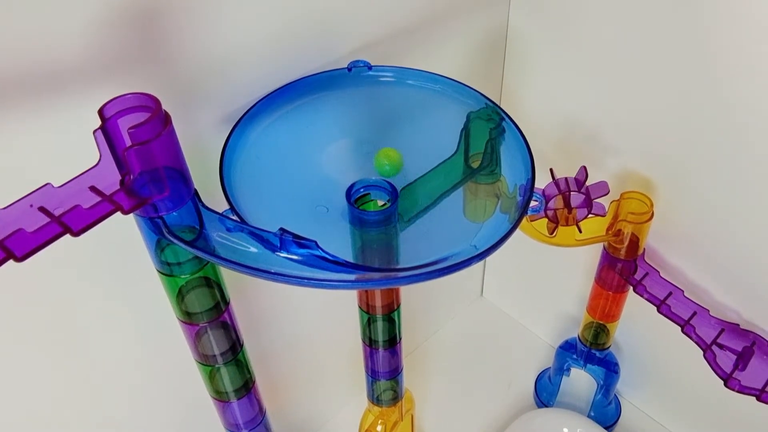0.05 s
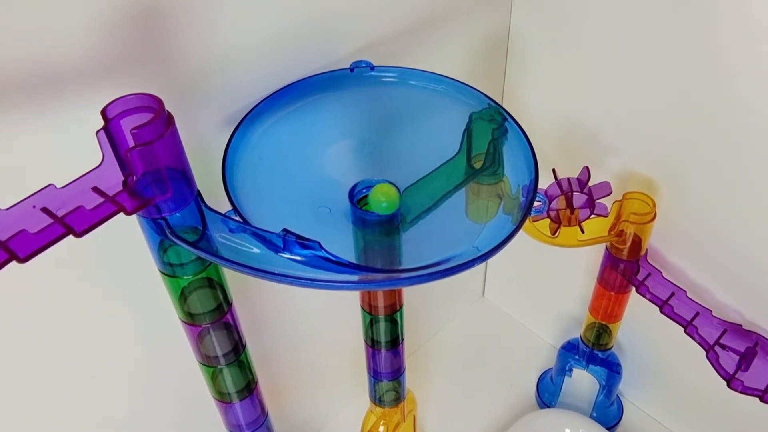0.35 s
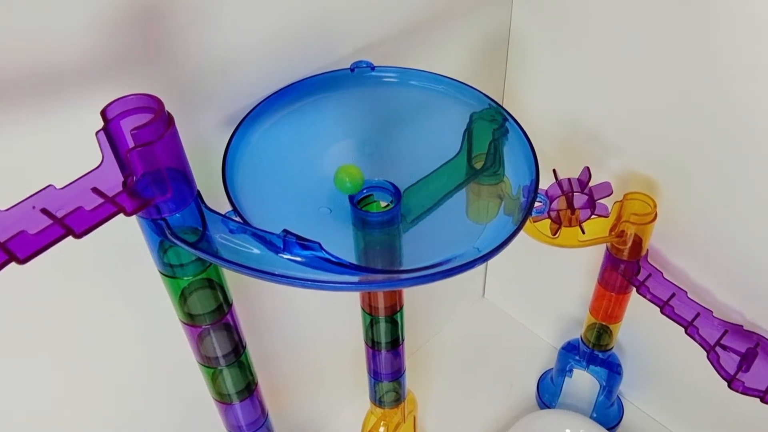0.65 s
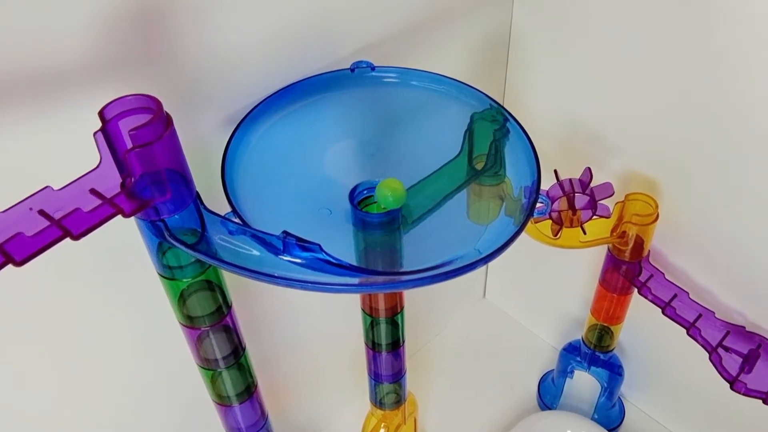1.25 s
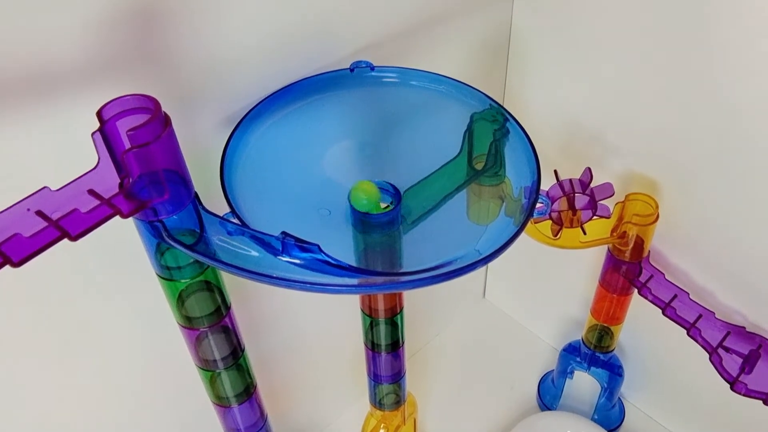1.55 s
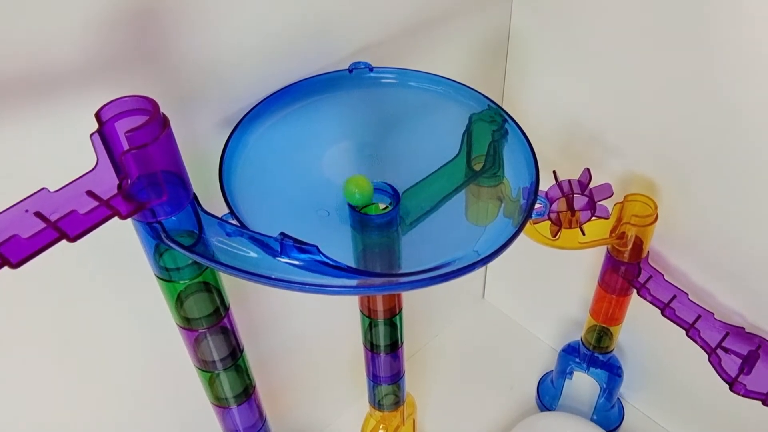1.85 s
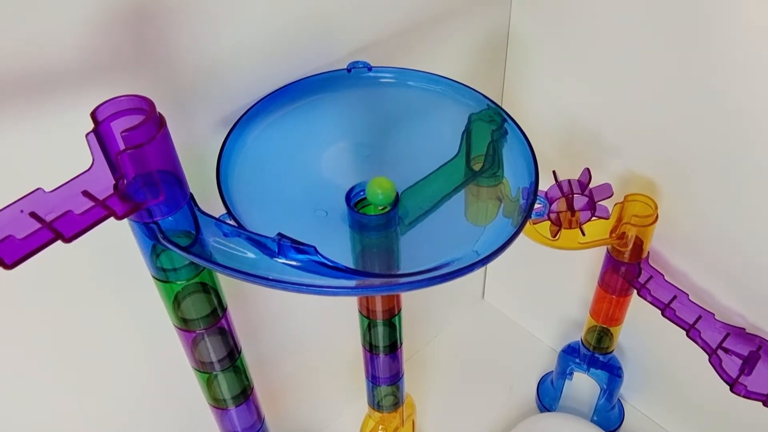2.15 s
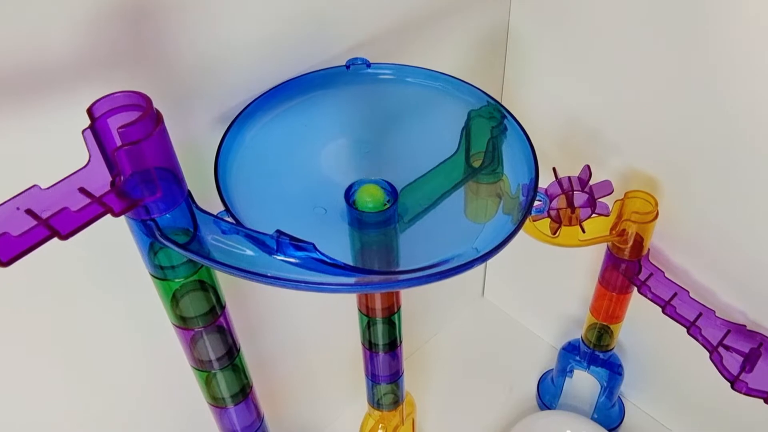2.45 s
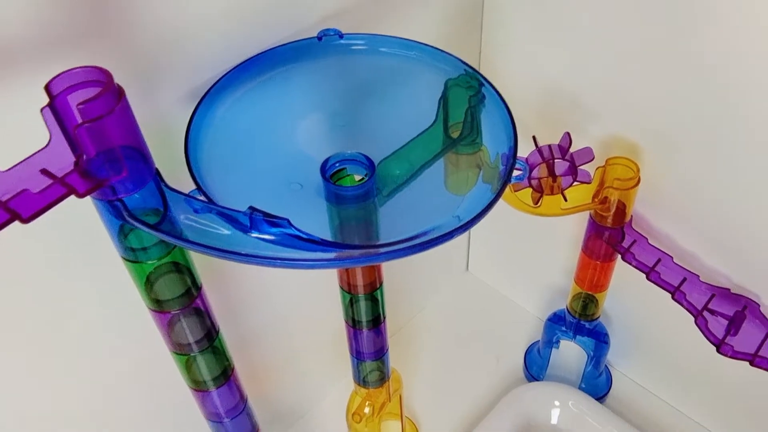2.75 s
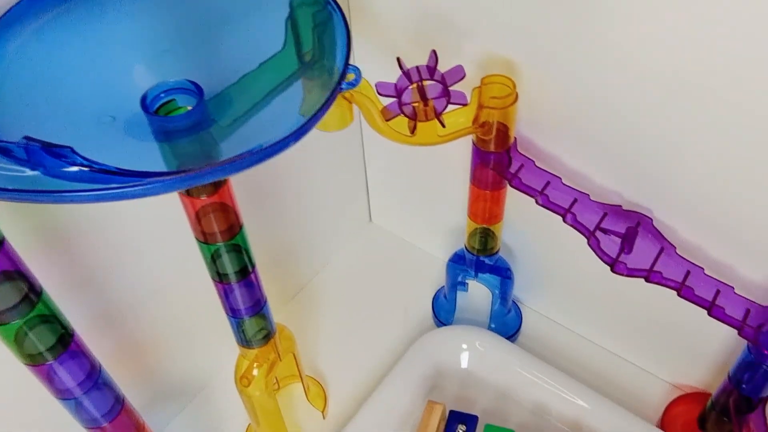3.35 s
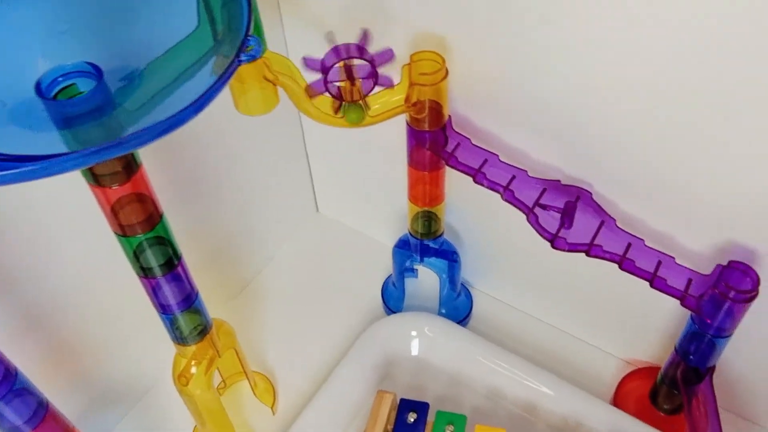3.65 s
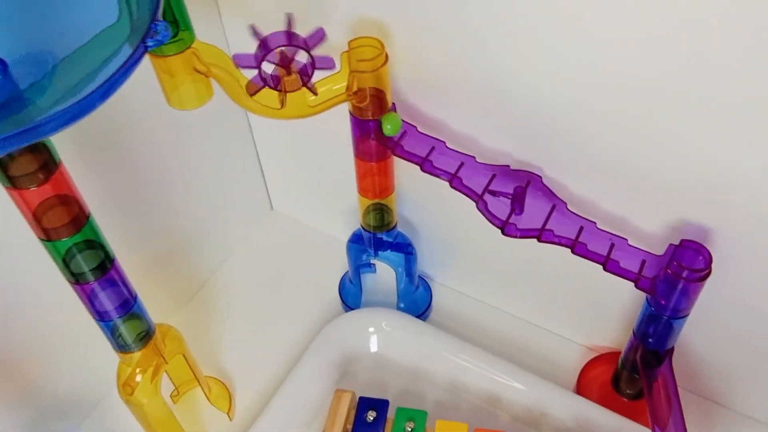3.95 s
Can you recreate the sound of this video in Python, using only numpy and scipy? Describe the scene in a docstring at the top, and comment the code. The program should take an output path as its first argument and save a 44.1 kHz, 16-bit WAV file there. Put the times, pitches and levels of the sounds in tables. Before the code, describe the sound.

A marble circles a plastic funnel, rattles through and clatters along a toy track.

```python
"""Over the low rumble of a small, quiet room, a glass marble circles a plastic funnel, ringing the
bowl as it rolls over tiny flaws. It spirals faster and, near 2.5 s, rattles through the neck.
It runs down a chute and, from 3.1 s, bounces in a hollow tower, trips a paddle wheel and drops
onto the next track. The room answers each knock with a short tail."""
import sys
import numpy as np
from scipy import signal
from scipy.fft import rfft, irfft
from scipy.io import wavfile

SR = 44100
rng = np.random.default_rng(int(sys.argv[2]) if len(sys.argv) > 2 else 0)


def unload_audio(sound):
    """Save the sound as a 16-bit wav file, at the path given as the first command line argument."""
    columns = np.transpose(np.atleast_2d(sound))
    # keep every value between -1 and 1, then stretch to whole-number steps
    steps = np.round(np.clip(columns, -1, 1) * 32767)
    wavfile.write(sys.argv[1], SR, steps.astype(np.int16))


N = 176400

# tone of the room's rumble (frequency [Hz], level [dB])
RUMBLE_COLOUR = [(25, -6.5), (72, 4), (100, -6.5), (300, -23.5), (700, -19.5), (3000, -28), (6000, -65),
                 (16500, -47)]
# rolling in the bowl, swelling on each orbit (time [s], level [dB])
BOWL_ROLL = [(0, -54.5), (.06, -63.5), (.11, -73.5), (.15, -57.5), (.34, -63.5), (.38, -70.5), (.46, -63.5),
             (.52, -57), (.63, -60.5), (.7, -80), (.78, -55), (.86, -67.5), (1.05, -59.5), (1.16, -53),
             (1.22, -79.5), (1.4, -63), (1.46, -72.5), (1.6, -71.5), (1.68, -55.5), (1.745, -48.5),
             (1.78, -102), (1.96, -61.5), (2.02, -50.5), (2.08, -64.5), (2.17, -54), (2.22, -56),
             (2.33, -41.5), (2.37, -67), (2.47, -42), (2.66, -45)]
# bumps over flaws in the bowl (time [s], body [dB], treble [dB])
BOWL_BUMPS = [(0.015, -47.5, -65), (0.129, -50, -65), (0.162, -46.5, -64), (0.208, -43.5, -63),
              (0.468, -57, -69.5), (0.589, -43.5, -56), (0.648, -50.5, -78), (0.962, -71, -88),
              (1.035, -51.5, -60), (1.737, -55, -56.5), (1.886, -50.5, -58.5), (1.998, -45.5, -50.5),
              (2.191, -40, -47), (2.211, -40, -44), (2.318, -34, -36)]
# the tightening spiral (time [s], orbit period [s])
ORBIT_PERIODS = [(1.3, .44), (2.199, .16), (2.602, .04)]
# crowded, short resonances of the bowl (frequency [Hz], level [dB])
BOWL_COLOUR = [(100, -34), (280, -12), (520, -1.5), (820, -24.5), (1080, -26), (1300, 4), (2200, 10),
               (3200, -7), (4300, -14), (7400, -32), (9500, -63), (15000, -55)]
# clear ring of the bowl and of its hollow rim (frequency [Hz], level [dB], t60 [s])
BOWL_RING = [(710, -13, 0.095), (1260, 1, 0.12), (1465, -2, 0.079), (1592, -4.5, 0.083), (1753, -0.5, 0.12),
             (1910, -2, 0.094), (2140, 1, 0.076), (2845, -10, 0.04), (3434, -13.5, 0.074)]
RIM_RING = [(754, -1.5, .12), (842, 0, 0.11), (970, 2, 0.13)]
# marble spinning in the neck (time [s], level [dB])
NECK_SPIN = [(2.42, -59), (2.58, -46.5), (2.71, -32), (2.84, -48)]
# rattles against the neck (time [s], body [dB], treble [dB])
NECK_RATTLES = [(2.456, -38, -51.5), (2.514, -49, -43.5), (2.554, -50, -49), (2.594, -36.5, -37),
                (2.624, -32, -37.5), (2.66, -28.5, -30), (2.674, -25.5, -27), (2.68, -32, -26.5),
                (2.685, -21.5, -19.5), (2.699, -15, -30), (2.733, -30, -41), (2.777, -33, -40.5)]
# crowded resonances of the neck (frequency [Hz], level [dB])
NECK_COLOUR = [(100, -17), (480, -21), (720, -9.5), (980, -37.5), (1400, 1.5), (3300, 0), (5000, -6),
               (9800, -19), (14000, -15.5), (16000, -23.5)]
# clear ring of the neck (frequency [Hz], level [dB], t60 [s])
NECK_RING = [(704.6, -7, 0.099), (1236, -3.5, 0.17), (1434, 4.5, 0.054), (1766, -10, 0.14),
             (2120, 3.5, 0.093), (3230, -6.5, 0.056), (3985, 0.5, 0.048), (5010, 1, 0.048)]
# marble running along the chutes (time [s], level [dB])
CHUTE_ROLL = [(2.7, -49), (2.8, -48), (2.85, -53.5), (2.97, -50.5), (3.08, -53.5), (3.2, -56.5),
              (3.33, -45), (3.43, -115), (3.56, -46.5), (3.66, -41.5), (3.81, -44), (3.9, -58), (4.0, -36)]
# crowded resonances of chute and track (frequency [Hz], level [dB])
TRACK_COLOUR = [(40, -55), (90, -4), (200, -8), (490, -15.5), (900, -2), (2600, 3.5), (4400, 6.5),
                (5600, -4), (7500, -12), (10000, -25.5), (11500, -18), (13000, -22), (15300, -6),
                (16200, -25)]
# ring of the chute under the marble (frequency [Hz], level [dB], t60 [s])
CHUTE_RING = [(1043.5, 0, 0.091), (1486, 0, 0.05), (2100, 0, 0.11)]
# hits on tower, wheel and track (time [s], thud [dB], body [dB], treble [dB], tick [dB])
KNOCK_HITS = [(3.091, -45.5, -19, -17, -25), (3.138, -41, -33.5, -23.5, -42),
              (3.156, -30.5, -24, -18, -19.5), (3.183, -40.5, -23, -53, -29),
              (3.211, -34.5, -29, -18, -25.5), (3.259, -48.5, -33.5, -24.5, -31.5),
              (3.2949, -60, -34, -28, -37), (3.3175, -43.5, -63, -32.5, -38), (3.479, -78, -52, -69, -102),
              (3.526, -82, -62, -73, -89), (3.5683, -47, -29, -22.5, -30),
              (3.642, -41.5, -39.5, -60, -22.5), (3.6892, -47, -57, -68, -26.5),
              (3.7575, -51.5, -43.5, -30, -33.5), (3.919, -46.5, -23.5, -16.5, -31.5),
              (3.936, -41, -31, -26, -31), (3.954, -47, -36, -28, -38), (3.978, -36.5, -20.5, -38.5, -14.5),
              (3.993, -37, -48, -24, -43)]
# borders of a knock's four bands (bottom [Hz], thud/body [Hz], body/treble [Hz], treble/tick [Hz],
# top [Hz])
BAND_EDGES_HZ = [65, 500, 2600, 8000, 17000]
# t60 of those bands (thud [s], body [s], treble [s], tick [s])
KNOCK_DECAYS = [0.071, 0.08, 0.036, .028]
# boom of the hollow tower and ring of the struck track (frequency [Hz], level [dB], t60 [s])
TOWER_BOOM = [(146.6, -1.5, 0.19), (168.4, -4.5, 0.4), (275, 0.5, 0.22)]
TRACK_RING = [(1215, -7, 0.097), (1451, 3, 0.089), (2243, -1.5, 0.071), (2746, 4, 0.067), (4030, -12, 0.17),
              (4440, 1, 0.052)]
# length of the room's tail (frequency [Hz], t60 [s])
ROOM_DECAY = [(150, 0.43), (1500, 0.35), (8000, 0.28), (15000, 0.14)]
# stereo balance (frequency [Hz], left minus right [dB])
STEREO_TILT = [(100, 0), (700, -2), (1300, 1), (4400, 4), (7000, 2), (9500, -4.5), (15000, 0)]

FIRM_DB, TREBLE_GROWTH, TOP_GROWTH = -32.5, 0.61, 0.2  # contact brightens as its level rises


def amp(db):
    """Decibels to gain."""
    return 10 ** (np.asarray(db) / 20)


def unit_rms(x):
    """Scales to unit rms."""
    return x / np.sqrt(np.mean(x ** 2) + 1e-30)


def unit_energy(x):
    """Scales each channel to unit energy."""
    return x / np.sqrt(np.sum(x ** 2, -1, keepdims=True) + 1e-30)


def read(points, hz):
    """Reads a table over log frequency."""
    f, value = np.transpose(points)
    return np.interp(np.log(hz + 1), np.log(f), value)


def add(mix, start_s, sound):
    """Mixes a sound in at its cue."""
    part = mix[:, round(start_s * SR):][:, :sound.shape[-1]]
    part += sound[..., :part.shape[-1]]


def eq(x, gain):
    """Filters by a gain that is a function of frequency."""
    size = x.shape[-1]
    return irfft(rfft(x) * gain(np.fft.rfftfreq(size, 1 / SR)), size)


def passband(f, lo, hi):
    """Gain of a band with rounded edges."""
    return 1 / np.sqrt((1 + (lo / (f + 1)) ** 10) * (1 + (f / hi) ** 10))


def excite(force, response):
    """Plays a signal through a stereo impulse response."""
    return signal.oaconvolve(np.atleast_2d(force), response, axes=1)[:, :N]


def noise(colour, size):
    """Two channels of coloured noise."""
    return unit_rms(eq(rng.standard_normal((2, size)), lambda f: amp(read(colour, f))))


def rumble():
    """Room tone: a faint, steady bed of low noise."""
    return amp(-66) * noise(RUMBLE_COLOUR, N)


def grains(per_s=1400, spread_db=5):
    """Tiny flaws of the surface that the marble strikes at random."""
    sizes = amp(spread_db * np.minimum(rng.exponential(1, N), 3)) * rng.choice([-1, 1], N)
    return unit_rms(sizes * (rng.random(N) < per_s / SR))


def contact(curve, treble_db, bumps=(), rise_s=.01, fall_s=.01, roll_db=0, bump_db=0):
    """Body and treble envelopes [dB]: a lumpy roll, brighter when firmer, plus short bumps."""
    t = np.arange(N) / SR
    lumps_db = 3 * unit_rms(eq(rng.standard_normal(N), lambda f: f < 47))
    body = np.interp(t, *np.transpose(curve), left=-120, right=-120) + roll_db + lumps_db
    treble = body + treble_db + TREBLE_GROWTH * (body - FIRM_DB)
    power = amp([body, treble]) ** 2
    age = t[:SR // 8]
    bump = np.minimum(age / rise_s, 1) * np.exp(-np.maximum(age - rise_s, 0) / fall_s)
    for start, *db in bumps:
        add(power, start, (amp(bump_db) * amp(db)[:, None] * bump) ** 2)
    return 10 * np.log10(power)


def sectors(count):
    """Crossfades the contact round the funnel's sectors as the marble circles ever faster."""
    turns = np.cumsum(1 / np.interp(np.arange(N) / SR, *np.transpose(ORBIT_PERIODS))) / SR
    distances = [abs((turns - k / count) % 1 - .5) for k in range(count)]
    return [np.sqrt(np.maximum(1 - count * distance, 0)) for distance in distances]


def ringing(modes, t, spread_db=0):
    """Damped modes, their strength varying with the spot struck, in a random phase at each mic."""
    out = 0
    for hz, db, t60 in modes:
        envelope = amp(db + spread_db * rng.standard_normal() - 60 * t / t60)
        out += envelope * np.sin(2 * np.pi * (hz * t + rng.random((2, 1))))
    return out


def shell(colour, t60, modes, modes_db, spread_db=0, rise_s=0.00037):
    """Voice of a plastic part: crowded short resonances and a few clear modes."""
    t = np.arange(SR // 5) / SR
    crowd = unit_energy(noise(colour, len(t)) * amp(-60 * t / t60))
    clear = amp(modes_db) * unit_energy(ringing(modes, t, spread_db))
    return (crowd + clear) * (1 - np.exp(-(t / rise_s) ** 2))


def rolling(force, levels, response, top_db):
    """Contact force rings a part in three bands; hard contact opens up the top one."""
    body, treble = levels
    top = treble + top_db + TOP_GROWTH * (treble - FIRM_DB)
    edges = BAND_EDGES_HZ[:1] + BAND_EDGES_HZ[2:]  # thud and body as one band
    out = 0
    for db, lo, hi in zip((body, treble, top), edges, edges[1:]):
        band = signal.sosfilt(signal.butter(6, [lo, hi], "band", fs=SR, output="sos"), response)
        out += excite(force * amp(db), unit_energy(band))
    return out


def funnel(spread_db=2, rim_db=-9, rim_fade_db_per_s=11.5):
    """The marble circles the bowl, then chatters in the neck; each sector has its own ring."""
    t = np.arange(N) / SR
    circling = contact(BOWL_ROLL, treble_db=-2, roll_db=1,
                       bumps=BOWL_BUMPS, rise_s=0.0077, fall_s=0.0028, bump_db=6)
    chatter = contact(NECK_SPIN, treble_db=-8.5,
                      bumps=NECK_RATTLES, rise_s=0.0033, fall_s=0.0067, bump_db=3.5)
    rim_gain = amp(circling[0] + rim_db - rim_fade_db_per_s * t)  # the marble leaves the rim behind
    out, flaws = 0, grains()
    for share in sectors(count=3):
        force = share * flaws
        bowl = shell(BOWL_COLOUR, t60=0.028, modes=BOWL_RING, modes_db=4.7, spread_db=spread_db)
        neck = shell(NECK_COLOUR, t60=0.07, modes=NECK_RING, modes_db=0)
        rim = unit_energy(ringing(RIM_RING, t[:SR // 5], 2 * spread_db))
        out += rolling(force, circling, bowl, top_db=-25)
        out += rolling(force, chatter, neck, top_db=-19.5)
        out += excite(force * rim_gain, rim)
    return out


def chute():
    """The marble runs along the narrow track, which rings hollow."""
    force = grains()
    running = contact(CHUTE_ROLL, treble_db=-3.5, roll_db=-3.5)
    track = shell(TRACK_COLOUR, t60=0.015, modes=CHUTE_RING, modes_db=-13.5)
    return rolling(force, running, track, top_db=-7)


def knocks(rise_s=0.0027, sag=0.093, sag_s=0.061, detune=0.02, likeness=0.51):
    """Each hit layers a sinking tower boom, a track ring that varies with the spot, and a clack."""
    t = np.arange(SR // 3) / SR
    out = np.zeros((2, N))
    common = noise(TRACK_COLOUR, len(t))  # the character that all hits share
    attack = 1 - np.exp(-(t / rise_s) ** 2)
    sinking = t + sag * sag_s * (1 - np.exp(-t / sag_s))  # starts sharp, settles to pitch
    for start, *levels in KNOCK_HITS:
        thud_db, body_db = levels[:2]
        clack = likeness * common + np.sqrt(1 - likeness ** 2) * noise(TRACK_COLOUR, len(t))
        detuned = t * (1 + detune * rng.standard_normal())
        boom = amp(thud_db - 5) * ringing(TOWER_BOOM, sinking)[0]
        ring = amp(body_db - 8.5) * ringing(TRACK_RING, detuned, spread_db=1.5)
        knock = boom + ring
        for db, t60, lo, hi in zip(levels, KNOCK_DECAYS, BAND_EDGES_HZ, BAND_EDGES_HZ[1:]):
            band = unit_rms(eq(clack, lambda f: passband(f, lo, hi)))
            knock += band * amp(db - 60 * t / t60)
        add(out, start, attack * knock)
    return out


def room(x, delay_s, wet_db=-5):
    """Adds dense reflections that fade in around delay_s; the highs die first."""
    size = SR // 2
    fade_in = np.clip(np.arange(size) / SR / delay_s - .5, 0, 1)
    taps = rng.standard_normal((2, size)) * (rng.random((2, size)) < .1) * fade_in
    hz, t, spectrum = signal.stft(taps, SR, nperseg=256)
    decay = amp(-60 * t / read(ROOM_DECAY, hz)[:, None])
    tail = signal.istft(spectrum * decay, SR)[1]
    return x + amp(wet_db) * excite(x, unit_energy(tail))


def scene(mic_lag_s=0.00025, wide_hz=1090):
    """Funnel and track in the room, heard by two close mics that share most of the bass."""
    def width(f):
        return np.minimum(0.29 + 0.68 * (f / wide_hz) ** 2, 1)

    left, right = room(funnel(), delay_s=0.0011) + room(chute() + knocks(), delay_s=0.0049) + rumble()
    shared = eq(left, lambda f: np.sqrt(1 - width(f) ** 2) * np.exp(2j * np.pi * f * mic_lag_s))
    return np.array([left, shared + eq(right, width)])


def record(dry, low_cut_hz=52.4, high_cut_hz=16200):
    """Left-right colour and low cut of the mics, then a steep high cut."""
    def mic_gain(f):
        return amp(np.outer([.5, -.5], read(STEREO_TILT, f))) * passband(f, low_cut_hz, SR)

    padded = np.pad(dry, ((0, 0), (0, SR // 10)))
    heard = eq(padded, mic_gain)[:, :N]
    high_cut = signal.firwin(255, high_cut_hz, window=("kaiser", 9), fs=SR)
    return signal.oaconvolve(heard, high_cut[None], "same")


dry = scene()
out = record(dry)
unload_audio(out)
```